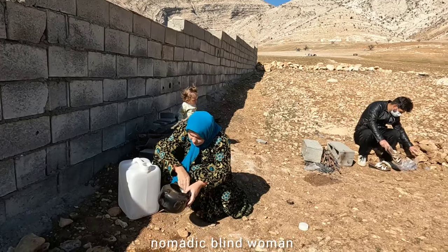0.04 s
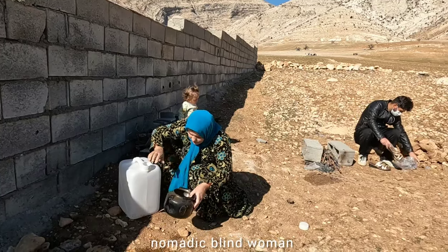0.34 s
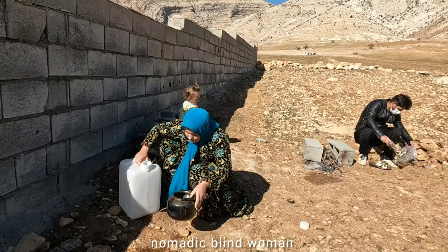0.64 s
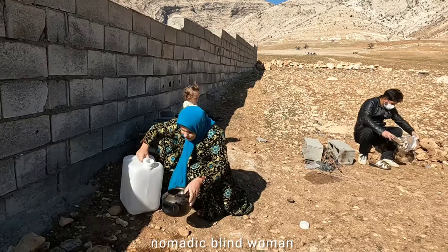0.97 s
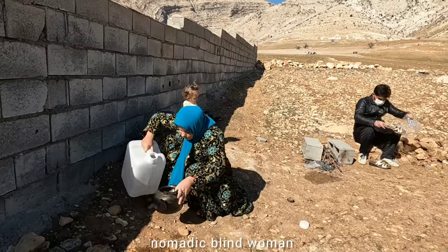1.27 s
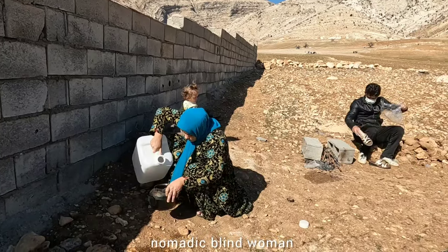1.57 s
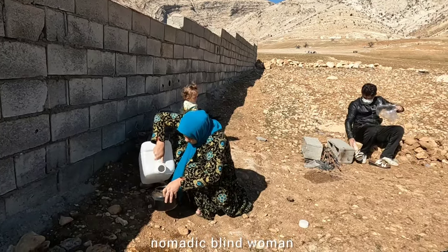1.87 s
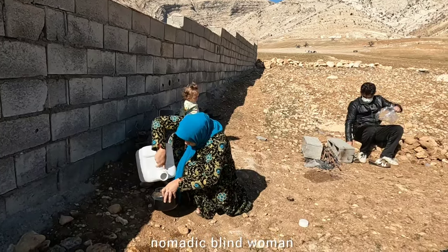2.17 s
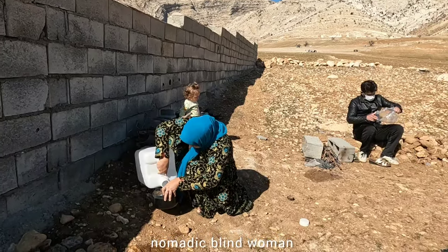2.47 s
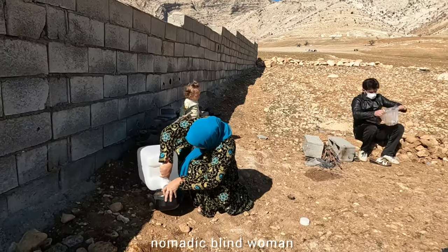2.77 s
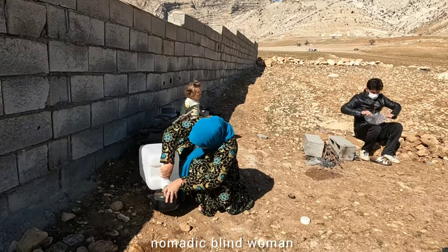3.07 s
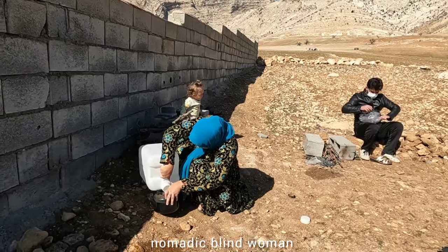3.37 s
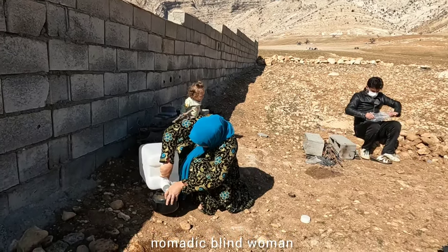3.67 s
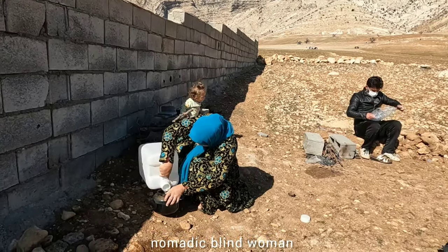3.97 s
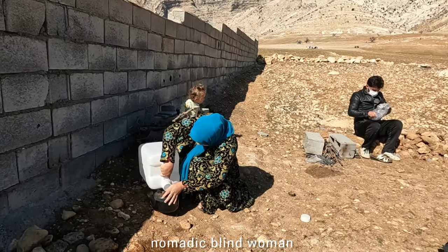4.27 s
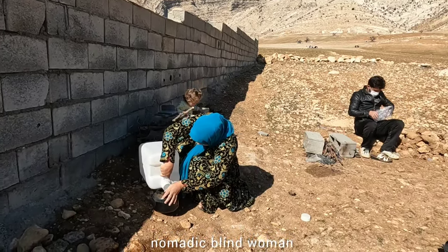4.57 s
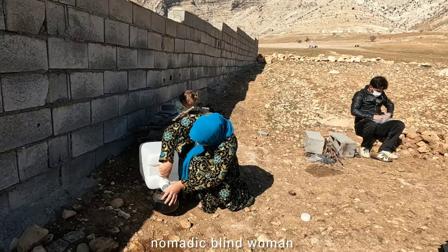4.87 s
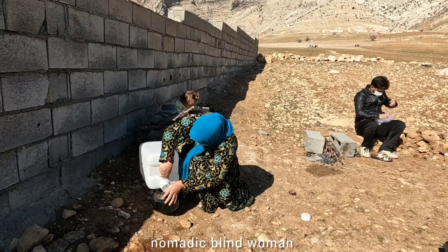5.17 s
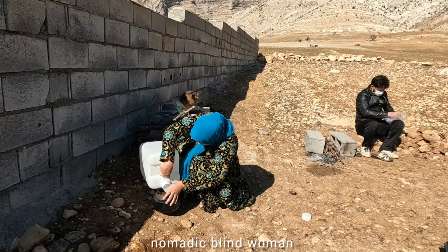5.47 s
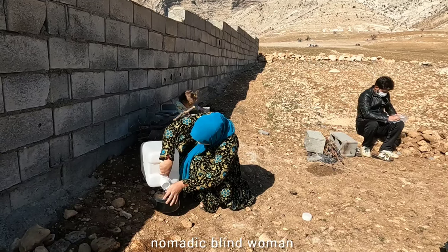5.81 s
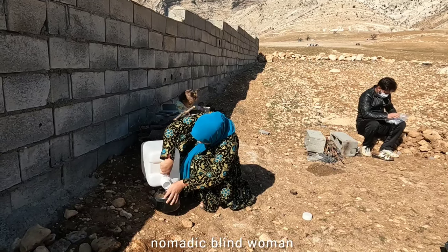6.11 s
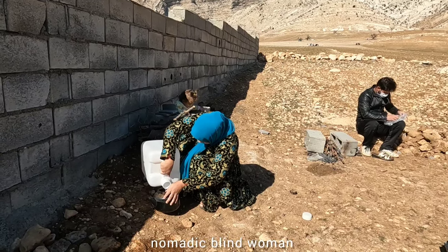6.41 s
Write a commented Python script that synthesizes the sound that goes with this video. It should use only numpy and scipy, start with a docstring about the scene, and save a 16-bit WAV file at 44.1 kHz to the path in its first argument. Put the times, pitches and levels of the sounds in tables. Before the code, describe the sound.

A plastic jerrycan is opened and tipped, then water pours hissing and gurgling into a metal kettle while wind thumps on the microphone.

```python
"""Water poured from a plastic jerrycan into a metal kettle, outdoors beside a block wall.
First the cap snaps off and the can is dragged and tipped, its hollow body booming dully.
Then the jet hisses and drives bubbles under; the kettle gurgles and rings, its pitch bent by the
sloshing, and air glugs back into the can, mostly towards the end. The stereo microphone picks up
a brief answer from wall and ground, and wind rumbles and thumps on it throughout."""
import sys
import numpy as np
from scipy import signal
from scipy.fft import rfft, irfft, next_fast_len
from scipy.io import wavfile
from scipy.ndimage import uniform_filter1d, map_coordinates

SR = 44100
rng = np.random.default_rng(int(sys.argv[2]) if len(sys.argv) > 2 else 0)


def transcribe(signal):
    """Save signal, clipped to [-1, 1], as a 16-bit WAV file at the path in sys.argv[1]."""
    frames = np.atleast_2d(signal).T
    limited = np.clip(frames, -1, 1)
    pcm = np.round(limited * 32767).astype(np.int16)
    wavfile.write(sys.argv[1], SR, pcm)


N = 293176
POUR_START_S = 2.566


def amp(db):
    return 10 ** (np.asarray(db) / 20)


def unit(x):
    return x / np.sqrt(np.mean(x ** 2) + 1e-20)


def peaked(x):
    return x / np.abs(x).max()


def along(points, hz):
    """Read (frequency, value) points on a log frequency axis."""
    f, values = np.transpose(points)
    return np.interp(np.log(hz + 1), np.log(f + 1), values)


def curves(rows):
    """One value per sample for each column after the time."""
    times, *columns = np.transpose(rows)
    return [np.interp(np.arange(N) / SR, times, column) for column in columns]


def wobble(rate):
    """A smooth random curve, rate knots a second."""
    return map_coordinates(rng.standard_normal(int(N * rate / SR) + 4), [np.arange(N) * rate / SR])


def filtered(x, response):
    """Pass x through a response given as a function of frequency."""
    n = x.shape[-1]
    padded = next_fast_len(n + SR // 4)
    return irfft(rfft(x, padded) * response(np.fft.rfftfreq(padded, 1 / SR)), padded)[..., :n]


def resonance(f, hz, width):
    return 1j * f * width / (hz * hz - f * f + 1j * f * width)


def contact_band(hz):
    """Small hard contacts radiate neither bass nor the highest treble."""
    return hz ** 2 / (hz ** 2 + 850 ** 2) / (1 + (hz / 8000) ** 10)


def add(track, s, sound):
    """Mix a sound in at s seconds."""
    rest = track[..., max(round(s * SR), 0):][..., :sound.shape[-1]]
    rest += sound[..., :rest.shape[-1]]


def spread(pair, spectrum):
    """Two unrelated signals become one coloured stereo sound of rms 1."""
    # likeness of the microphone's two sides: f/Hz, correlation
    likeness = [(60, 0.85), (600, 0.74), (7000, 0.86), (13000, 1)]

    def mid_side(hz):
        angle = np.arccos(np.clip(along(likeness, hz), -1, 1)) / 2
        return amp(along(spectrum, hz)) * [np.cos(angle), np.sin(angle)]
    mid, side = filtered(pair, mid_side)
    return unit(np.array([mid + side, mid - side]))


def rush(spectrum, patchy_db):
    """Stereo noise with patches of random gain in time and frequency."""
    cells = signal.stft(rng.standard_normal((2, N)), nperseg=512)[2]
    patches = uniform_filter1d(rng.standard_normal(cells.shape[1:]), size=6, axis=0)
    patches = unit(uniform_filter1d(patches, size=5, axis=1))
    noise = signal.istft(cells * amp(patchy_db * patches), nperseg=512)[1]
    return spread(noise[:, :N], spectrum)


def swells(rows, attack_s, sag_db_per_s, release_s):
    """Summed power of strokes that each rise, sag slowly while they last, and die away."""
    power = np.zeros(N)
    for s, length, db in rows:
        age = np.maximum(np.arange(N) / SR - s, 0)
        release = np.exp(-np.maximum(age - length, 0) / release_s)
        power += (amp(db - sag_db_per_s * age) * np.minimum(age / attack_s, 1) * release) ** 2
    return power


def wind(rumble_gain_db=5.5, gust_db=2, puff_cycles=3.46):
    """Eddies rumble on the microphone over faint outdoor air; the sharpest arrive as single thumps."""
    # strength of the breeze: t/s, level/dB
    breeze = [(0.0, -34.5), (0.41, -50), (0.8, -52.5), (1.41, -42), (1.57, -29.5), (1.81, -42), (2.48, -44),
              (3.07, -50), (3.6, -47.5), (4.24, -50.5), (5.15, -45.5), (6.65, -38)]
    # puffs on the microphone, the shorter the brighter: t/s, peak level/dB, half length/s
    puffs = [(0.16, -19.5, 0.016), (1.01, -27, 0.062), (1.463, -12, 0.019), (1.498, -14, 0.0047),
             (1.555, -10, 0.016), (2.096, -26.5, 0.012), (3.576, -23.5, 0.037), (3.934, -21.5, 0.087),
             (4.894, -18, 0.032), (5.393, -25.5, 0.048), (5.817, -23, 0.0074), (6.031, -19, 0.022),
             (6.134, -19, 0.0086), (6.182, -16.5, 0.018), (6.435, -17.5, 0.029), (6.519, -11.5, 0.022)]
    # spectrum of the rumble: f/Hz, relative level/dB
    rumble_spectrum = [(25, 2), (50, -2.5), (100, -18), (200, -22), (400, -60.5), (1000, -110)]
    # spectrum of a puff: f/Hz, relative level/dB
    puff_spectrum = [(10, 5.5), (35, 8.5), (95, -3.5), (170, -10.5), (280, -20.5), (400, -30.5),
                     (4000, -120)]
    # spectrum of the open air: f/Hz, relative level/dB
    air_spectrum = [(100, -13), (400, -29.5), (800, -38), (2000, -42.5), (3500, -51), (7000, -42),
                    (15000, -66.5)]
    breeze_db, = curves(breeze)
    eddies = spread(rng.standard_normal((2, N)), rumble_spectrum)
    local_power = np.abs(uniform_filter1d(np.mean(eddies ** 2, 0), size=3500))
    eddies /= np.sqrt(local_power + 0.03)  # evened out, so breeze and gusts set the level
    out = amp(breeze_db + rumble_gain_db + gust_db * wobble(17)) * eddies
    t = np.arange(SR // 4) / SR - 1 / 8
    buffet = spread(rng.standard_normal((2, N)), puff_spectrum)
    for s, db, half in puffs:
        start = s + t[0]
        eddy = buffet.take(round(start * SR) + np.arange(len(t)), axis=1, mode="wrap")
        eddy = filtered(eddy, lambda f: 1 / (1 + (f * half / puff_cycles) ** 2))
        envelope = np.hanning(len(t)) * np.exp(-.5 * (t / half) ** 2)
        add(out, start, amp(db) * peaked(envelope * eddy))
    return out + amp(-58 + wobble(4.28)) * spread(rng.standard_normal((2, N)), air_spectrum)


def rubbing(flutter_db=2, grit_db=2, ticks_per_s=14, tick_db=-56, tick_s=0.003):
    """Sleeves and the can's base slide: a gritty hiss that swells unevenly and catches in ticks."""
    # slides of sleeves and can: t/s, length/s, level/dB
    slides = [(.01, 0.19, -73), (.475, 0.25, -51.5), (.69, 0.19, -46.5), (.95, 0.41, -63.5),
              (1.5, 0.53, -63.5), (1.76, 0.25, -58)]
    # spectrum of the friction: f/Hz, relative level/dB
    friction_spectrum = [(250, -36), (550, -5.5), (800, -15.5), (1400, -4), (7300, -7.5), (10800, -22),
                         (15500, -34)]
    sliding = np.sqrt(swells(slides, attack_s=0.06, sag_db_per_s=17, release_s=0.092))
    grip = unit(amp(flutter_db * wobble(29.96) + grit_db * wobble(700)))
    catches = (rng.random(N) < ticks_per_s / SR) * rng.uniform(0.43, 2.1, N) * np.sqrt(peaked(sliding))
    ticks = amp(tick_db) * signal.lfilter([1], [1, -np.exp(-1 / (tick_s * SR))], catches)
    slightly_left = amp([[.8], [-.8]])
    return (sliding * grip + ticks) * rush(friction_spectrum, patchy_db=1.5) * slightly_left


def cap(ring_t60_s=0.028, crack_t60_s=0.012):
    """The plastic cap snaps free and rattles: a sharp crack, then its short, hard ring."""
    # snaps of the cap: t/s, peak level/dB
    snaps = [(0.258, -26.5), (0.2632, -31), (0.327, -49)]
    # modes of the cap: f/Hz, relative level/dB
    modes = [(1087, -4.5), (1640, -2.5), (1960, -1), (2530, -10), (6374, -15)]
    out, t = np.zeros(N), np.arange(SR // 10) / SR
    for s, db in snaps:
        ring = sum(amp(level) * np.sin(2 * np.pi * (hz * t + rng.random())) for hz, level in modes)
        ring *= amp(-60 * t / ring_t60_s)
        crack = rng.standard_normal(len(t)) * amp(4 - 60 * t / crack_t60_s)
        add(out, s, amp(db) * peaked(filtered(ring + crack, contact_band)))
    return out


def vessel_ring(t, modes, tilt_db, pitch, slosh, glide=0, slosh_hz=5, flutter_db=3.5):
    """A struck vessel rings; the water moving inside bends each mode and makes it flutter."""
    ring = 0
    for hz, db, t60 in modes:
        bend = 1 + glide * t + slosh * np.sin(2 * np.pi * (slosh_hz * t + rng.random()))
        flutter = map_coordinates(rng.standard_normal(len(t)), [t * 90], order=1)
        level = db + tilt_db * np.log2(hz / modes[0][0]) + flutter_db * flutter
        phase = 2 * np.pi * (np.cumsum(hz * pitch * bend) / SR + rng.random())
        ring += amp(level - 60 * t / t60) * np.sin(phase)
    return ring


def can_bumps(slap_db=-6.5, slap_t60_s=0.25, attack_s=0.0022):
    """The soft jerrycan booms when bumped, while water slaps its wall."""
    # bumps of the can: t/s, level/dB, brightness/(dB per octave)
    bumps = [(0.667, -39.5, -10), (1.837, -36.5, 1), (2.579, -32.5, -7), (2.635, -36, -11.5),
             (3.839, -39, -11.5)]
    # modes of the can, before the pitch factor: f/Hz, relative level/dB, t60/s
    modes = [(134.9, 5, 0.32), (183, -10, 0.6), (213.3, -1, 0.39), (260.6, -6.5, 0.35)]
    out, t = np.zeros(N), np.arange(SR // 2) / SR
    for s, db, tilt_db in bumps:
        slap = unit(filtered(rng.standard_normal(len(t)), lambda f: resonance(f, 320, 460) ** 2))
        slap *= amp(slap_db + tilt_db - 60 * t / slap_t60_s)
        boom = vessel_ring(t, modes, tilt_db, pitch=0.96, slosh=0.027)
        add(out, s, amp(db) * (boom + slap) * (1 - np.exp(-t / attack_s)))
    return out


def bubbles(times, hz, cycles, scatter_db, samples, ring_samples, rise=0.012):
    """Each bubble rings for some cycles and climbs in pitch as it nears the surface."""
    t = np.arange(ring_samples) / SR
    age = t * hz[:, None] / cycles
    phase = 2 * np.pi * hz[:, None] * t * (1 + rise * np.minimum(age, 2))
    envelope = np.exp(-age) * (1 - np.exp(-10 * age)) * (1 - t / t[-1])
    strength = amp(scatter_db * np.minimum(rng.exponential(size=(len(hz), 1)), np.pi))
    rings = strength * envelope * np.sin(phase)
    positions = (times * SR).astype(int)[:, None] + np.arange(ring_samples)
    return np.bincount(positions.ravel(), rings.ravel(), samples)[:samples]


def splash(hz, length_s, climb=0):
    """One splash releases a quick run of like-sized bubbles, climbing or falling in pitch; peak 1."""
    order = np.linspace(0, 1, 15)
    jitter, detune = rng.standard_normal((2, len(order))) * [[.35], [.16]]
    times = length_s * order * np.exp(jitter)
    pitches = hz * 2 ** (climb * (order - .5) + detune)
    return peaked(bubbles(times, pitches, cycles=5.5, scatter_db=1, samples=SR // 7, ring_samples=2000))


def loud_splashes():
    """The few splashes that stand out singly, each a run of bubbles."""
    # bubble runs: t/s, peak level/dB, f/Hz, length/s, climb/octaves
    runs = [(1.558, -42.5, 1004, 0.035, 0.13), (3.109, -39.5, 4180, 0.058, -0.17),
            (3.204, -34.5, 3250, 0.017, -.1), (3.206, -38.5, 1800, 0.046, -0.0008),
            (3.517, -35, 3240, .014, 0.16), (3.946, -35.5, 5700, 0.011, 0.21), (4.093, -42, 2630, .025, 0),
            (4.373, -41.5, 2030, 0.058, 0.079), (4.626, -36.5, 3000, 0.022, 0.53),
            (5.991, -41, 2930, 0.019, -0.21)]
    out = np.zeros(N)
    for s, db, hz, length_s, climb in runs:
        add(out, s, amp(db) * splash(hz, length_s, climb))
    return out


def rim_clicks():
    """Can and kettle rim touch: short dry contacts, each one resonance under a bright crack."""
    # hard contacts: t/s, peak level/dB, f/Hz, t60/s
    contacts = [(1.595, -41, 2090, 0.12), (1.832, -37.5, 1870, 0.13), (2.291, -46, 6900, 0.03),
                (2.341, -53, 1380, 0.044), (2.564, -33, 1050, 0.088), (4.764, -35.5, 1170, 0.086),
                (6.504, -34.5, 5200, 0.014)]
    out, t = np.zeros(N), np.arange(SR // 6) / SR
    for s, db, hz, t60 in contacts:
        burst = rng.standard_normal(len(t)) * amp(-60 * t / t60)
        colour = lambda f: (resonance(f, hz, hz / 2) + .25 * resonance(f, 5500, 15000)) * contact_band(f)
        add(out, s, amp(db) * peaked(filtered(burst, colour)))
    return out


def flow(trickle_db=-55.5, taper_start_s=5.84, taper_db_per_s=11.5):
    """Strength of the pour: surges on a trickle that thins as the can is eased back."""
    # surges from the spout: t/s, length/s, level/dB
    surges = [(2.56, 0.31, -57.5), (2.72, 0.09, -47.5), (3.1, 0.39, -49), (3.29, 0.057, -42),
              (3.53, 0.33, -46), (4.24, 0.465, -49.5), (4.78, 0.18, -46.5), (5.07, 0.18, -57),
              (5.39, 0.65, -53), (6.29, 0.17, -51.5)]
    t = np.arange(N) / SR
    trickle = amp(trickle_db - taper_db_per_s * np.maximum(t - taper_start_s, 0))
    surge_power = swells(surges, attack_s=0.043, sag_db_per_s=6, release_s=0.024)
    return (t > POUR_START_S) * np.sqrt(trickle ** 2 + surge_power)


def froth(low_hz, high_hz, cycles, scatter_db, count):
    """Two unrelated, steady streams of random bubbles."""
    streams = []
    for _ in range(2):
        times = rng.uniform(0, N / SR, count)
        pitches = low_hz * (high_hz / low_hz) ** rng.random(count)
        streams.append(bubbles(times, pitches, cycles, scatter_db, N, ring_samples=900, rise=0.04))
    return np.array(streams)


def pour(echo_t60_s=0.11, flutter_db=1.3):
    """The jet hisses and drives bubbles under, both in step with the flow."""
    # spectrum of the spray: f/Hz, relative level/dB
    spray_spectrum = [(250, -6.5), (540, -8), (740, -17.5), (930, -14), (1120, -6.5), (6850, -4.5),
                      (10700, -19), (12100, -21), (15500, -40)]
    # colour of the bubbles churning in the kettle: f/Hz, relative level/dB
    churn_spectrum = [(860, -12), (1100, 1), (1900, 3.5), (3000, -4.5), (7000, -30)]
    spray = rush(spray_spectrum, patchy_db=2.2)
    fizz = amp(-8) * spread(froth(2486, 11920, cycles=8.5, scatter_db=-1.5, count=4500), spray_spectrum)
    # bubbles echo inside the kettle, which leaves many narrow, steady peaks
    t = np.arange(SR // 8) / SR
    echo = rng.standard_normal((1, len(t))) * amp(-60 * t / echo_t60_s)
    popping = froth(779, 3330, cycles=6.1, scatter_db=3, count=2200)
    churn = amp(-7) * spread(signal.fftconvolve(popping, echo, axes=1)[:, :N], churn_spectrum)
    return flow() * amp(flutter_db * wobble(60)) * (spray + fizz + churn)


def spatter(count=50, low_hz=1427, high_hz=7030, over_flow_db=1.5):
    """Small splashes at random moments of the pour, their strength following the flow."""
    out, strength = np.zeros(N), flow() * amp(over_flow_db)
    for when, pitch in rng.random((count, 2)):
        s = POUR_START_S + when * (N / SR - POUR_START_S)
        hz = low_hz * (high_hz / low_hz) ** pitch
        add(out, s, strength[int(s * SR)] * splash(hz, length_s=0.021))
    return out


def gurgle(width_hz=70, swing_db=3.5, wander=0.04):
    """The stream stirs the air in the kettle: a hollow resonance, uneven in level and pitch."""
    # air resonance as the water rocks: t/s, f/Hz, level/dB
    air_resonance = [(2.9, 388, -73), (3.3, 457, -65.5), (3.7, 440, -59), (4.15, 409, -70),
                     (4.42, 451.4, -55), (4.75, 381, -65), (5.28, 407, -77), (5.39, 420.7, -61),
                     (5.78, 404.7, -60), (5.95, 420, -78)]
    hz, db = curves(air_resonance)
    stirring = wobble(width_hz) + 1j * wobble(width_hz)
    phase = 2 * np.pi * np.cumsum(hz * (1 + wander * wobble(20))) / SR
    hollow = unit(amp(swing_db * wobble(20)) * np.real(stirring * np.exp(1j * phase)))
    return (np.arange(N) / SR > POUR_START_S) * amp(db) * hollow


def plinks():
    """Large single bubbles ring out above the spray."""
    # large bubbles: t/s, peak level/dB, f/Hz
    large_bubbles = [(3.325, -42.5, 1785), (3.371, -36, 4860), (3.482, -45.5, 902), (3.932, -42.5, 1293),
                     (4.782, -44, 1850)]
    out, n = np.zeros(N), SR // 10
    for s, db, hz in large_bubbles:
        ring = bubbles(np.zeros(1), np.array([hz]), cycles=20, scatter_db=0, samples=n, ring_samples=n)
        add(out, s, amp(db) * peaked(ring))
    return out


def kettle_knocks(gain_db=-1, slap_db=-1.5, slap_t60_s=0.22, attack_s=0.0015):
    """Knocks and slaps make the metal kettle clang briefly, each with a rough splash."""
    # knocks: t/s, relative level/dB, brightness/(dB per octave), pitch factor, glide/(share per s)
    knocks = [(3.343, -44, -12, 1.13, -0.54), (3.523, -41, 3.5, 0.98, .5), (3.551, -44, 0.5, 1, -0.0092),
              (3.614, -44, -13, 1.04, 0.98), (4.617, -45, -27, .97, -0.76), (4.685, -49.5, -28, .95, -0.29),
              (5.011, -46.5, -30, 1, -0.33)]
    # modes of the kettle, before the pitch factor: f/Hz, relative level/dB, t60/s
    modes = [(402.7, 4, 0.23), (579, -3.5, 0.19), (774, -9, 0.38), (880, 0, 0.15), (1088, 1.5, 0.28),
             (1017, 3, 0.15), (1520, -10, 0.21), (1780, -8, 0.16)]
    out, t = np.zeros(N), np.arange(SR // 2) / SR
    slap_band = lambda f: resonance(f, 510, 2000) ** 2 / (1 + (f / 1800) ** 10)
    for s, db, tilt_db, pitch, glide in knocks:
        slap = unit(filtered(rng.standard_normal(len(t)), slap_band))
        slap *= amp(slap_db + tilt_db / 2 - 60 * t / slap_t60_s)
        clang = vessel_ring(t, modes, tilt_db, pitch, slosh=0.023, glide=glide)
        add(out, s, amp(db + gain_db) * (clang + slap) * (1 - np.exp(-t / attack_s)))
    return out


def glugs(t60_s=0.2):
    """Air gulps back into the can and rings in its neck: a rough, hollow knock."""
    # gulps of air: t/s, peak level/dB
    gulps = [(3.345, -41.5), (5.41, -50), (5.533, -50), (6.21, -46.5), (6.502, -38.5), (6.593, -47.5)]
    # resonances of the neck cavity: f/Hz, width/Hz, relative level/dB
    modes = [(510, 100, -2), (797, 29, 5.5), (1173, 150, -11)]
    out, t = np.zeros(N), np.arange(SR // 4) / SR
    neck = lambda f: sum((-1) ** k * amp(db) * resonance(f, hz, width)
                         for k, (hz, width, db) in enumerate(modes))
    for s, db in gulps:
        gulp = rng.standard_normal(len(t)) * amp(-60 * t / t60_s)
        add(out, s, amp(db) * peaked(filtered(gulp, neck)))
    return out


def wall(x, t60_s=0.066, delay_s=0.003):
    """The nearby ground and wall scatter a brief answer, different on each side of the microphone."""
    t = np.arange(SR // 6) / SR
    tail = rng.standard_normal((2, len(t))) * amp(-60 * t / t60_s) * (t > delay_s)
    return signal.fftconvolve(x[None], tail / np.linalg.norm(tail[0]), axes=1)[:, :N]


def scene():
    """Short sounds sit centre and come back off the wall; pour, rubbing and wind are heard direct."""
    water = loud_splashes() + plinks() + spatter() + glugs()
    handling = cap() + rim_clicks() + can_bumps() + kettle_knocks()
    events = water + handling
    return events + amp(-14.5) * wall(events) + pour() + gurgle() + rubbing() + wind()


def record(dry, left_lag_s=1.25e-5, top_hz=15600):
    """Stereo microphone: its ports differ in colour, the right is reached first, the top is cut off."""
    # imbalance of the ports: f/Hz, left minus right level/dB
    imbalance = [(50, -2), (300, -0.5), (4500, -2), (8000, 0.5), (13000, 3.5)]
    side = np.array([[.5], [-.5]])
    colour = lambda hz: amp(side * along(imbalance, hz))
    delay = lambda hz: np.exp(-2j * np.pi * hz * side * left_lag_s)
    return filtered(dry, lambda hz: colour(hz) * delay(hz) * (hz < top_hz))


dry = scene()
out = record(dry)
transcribe(out)
```